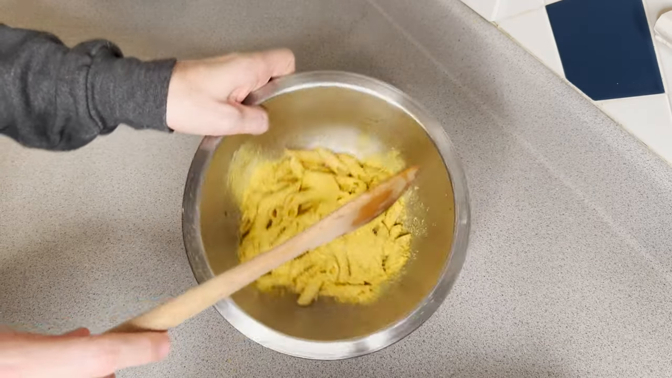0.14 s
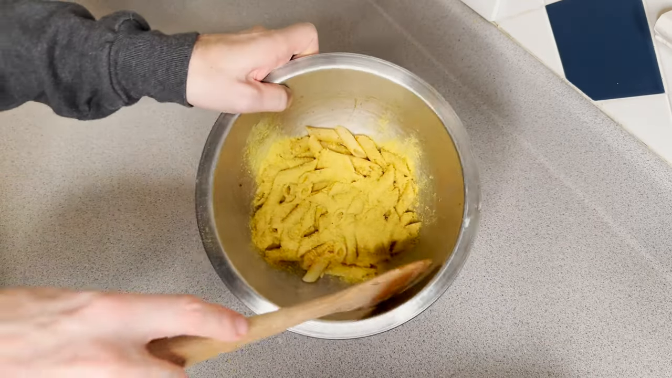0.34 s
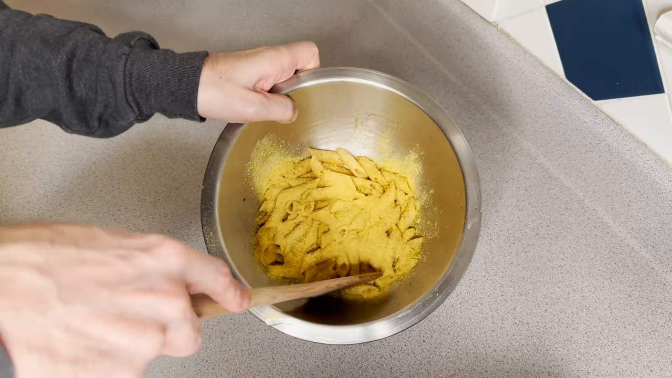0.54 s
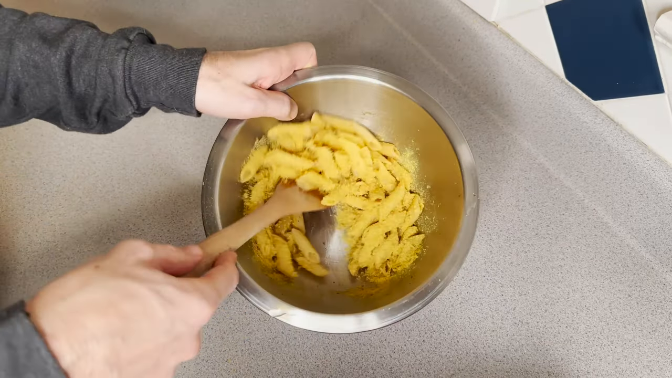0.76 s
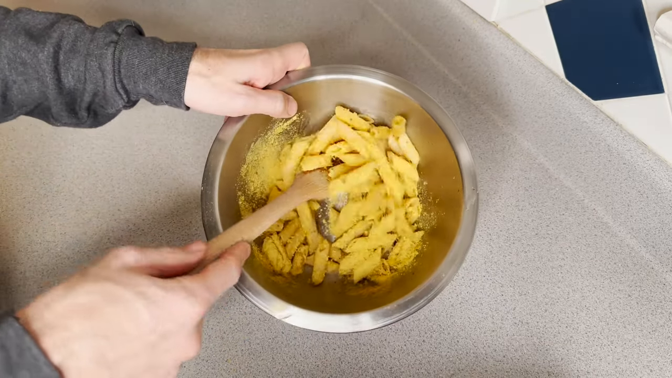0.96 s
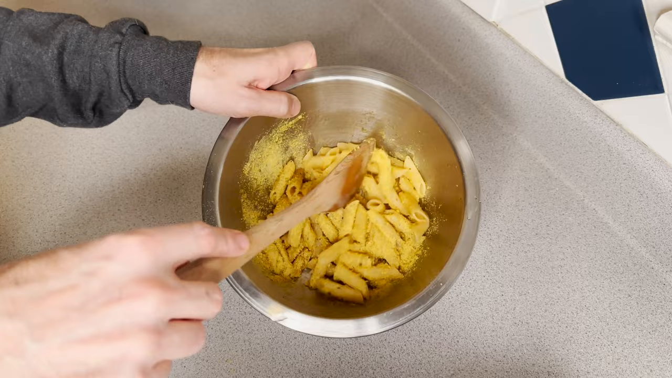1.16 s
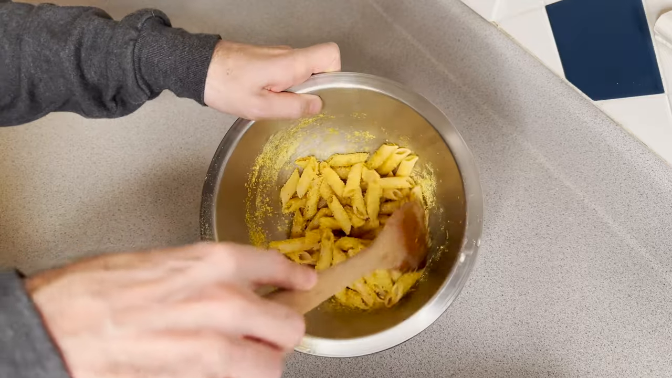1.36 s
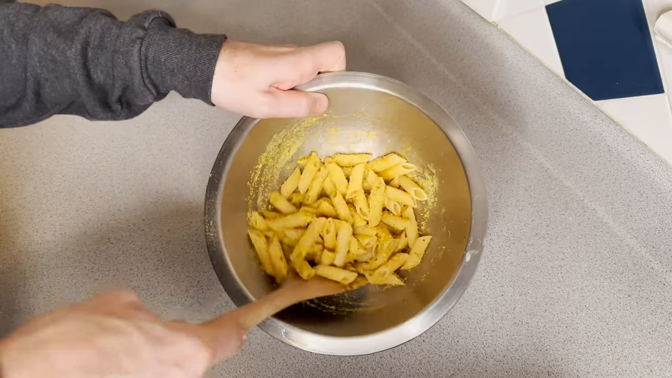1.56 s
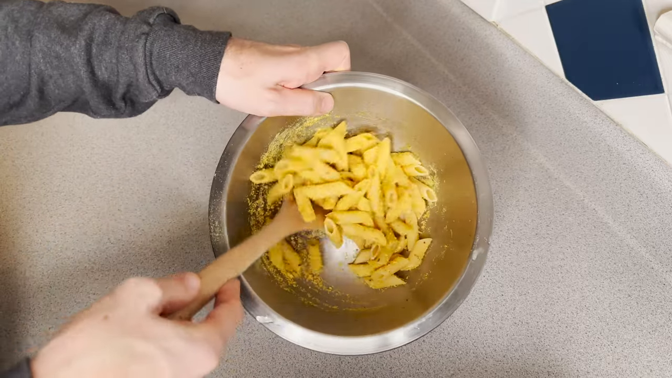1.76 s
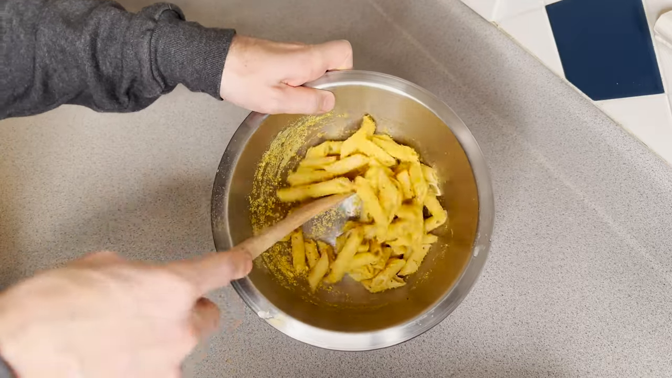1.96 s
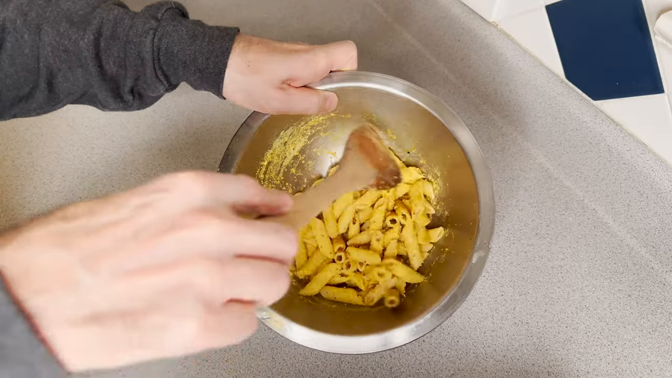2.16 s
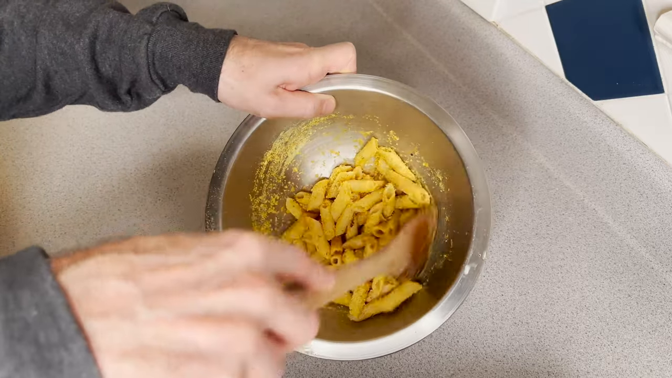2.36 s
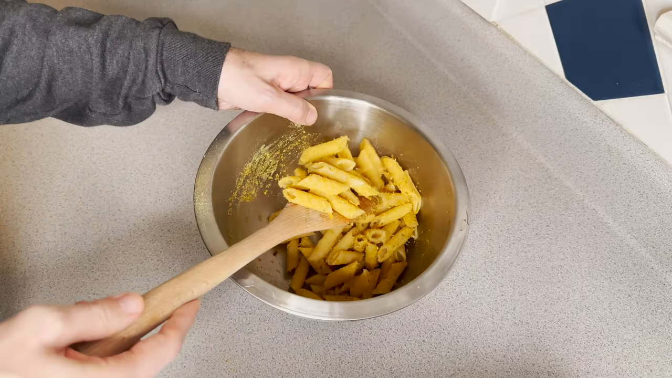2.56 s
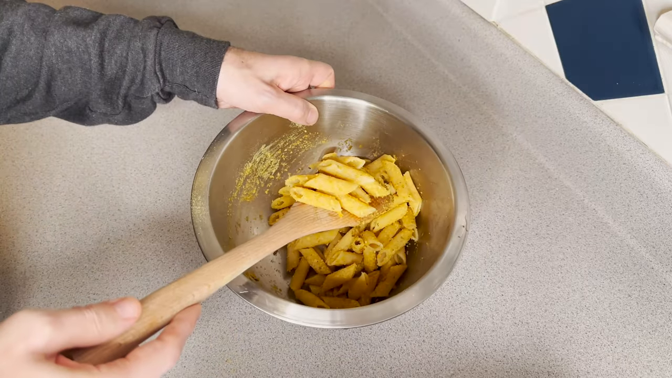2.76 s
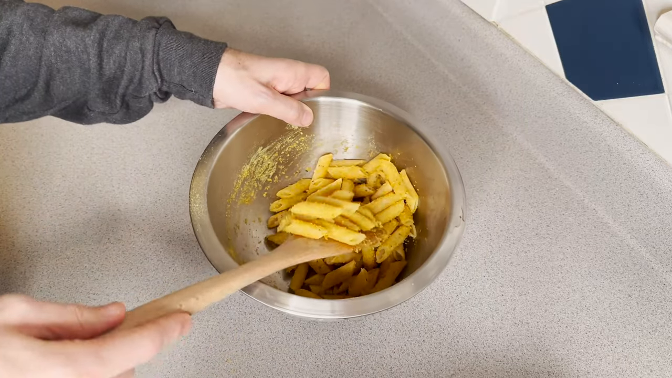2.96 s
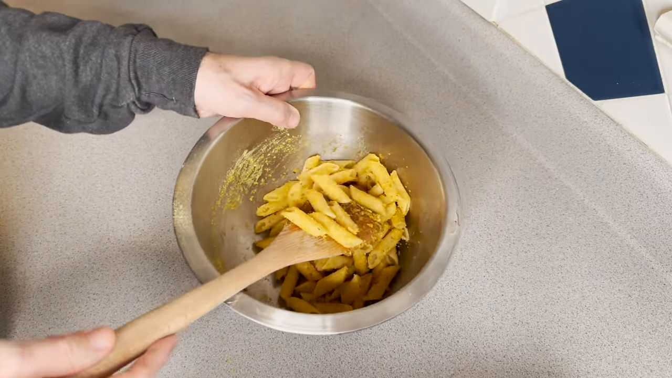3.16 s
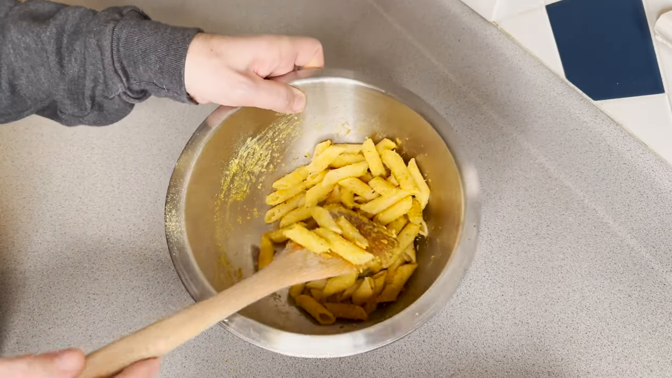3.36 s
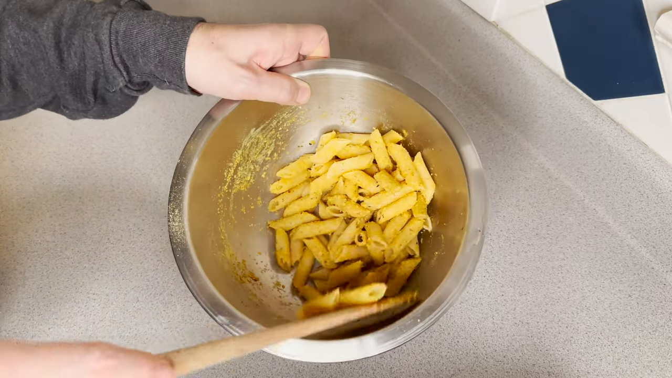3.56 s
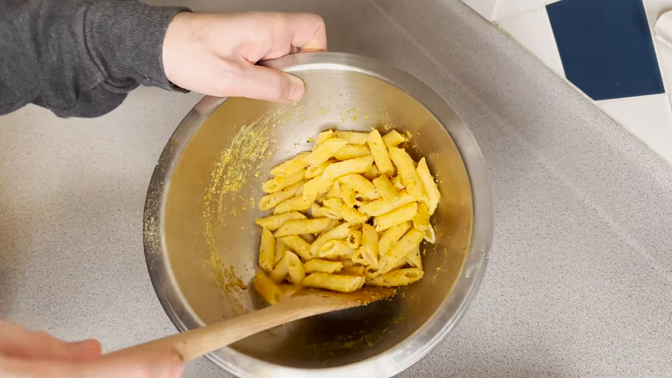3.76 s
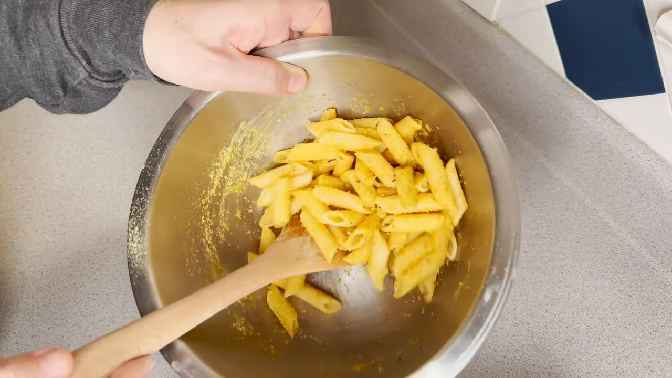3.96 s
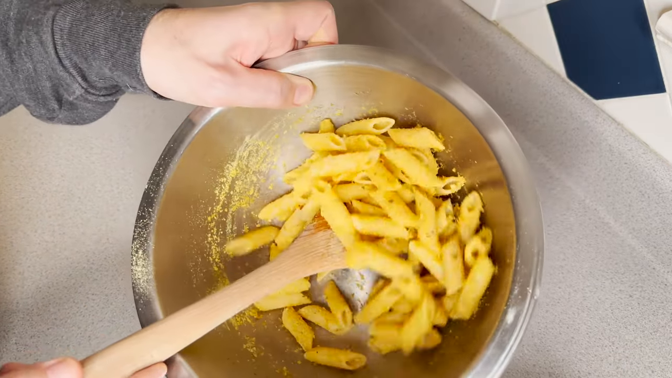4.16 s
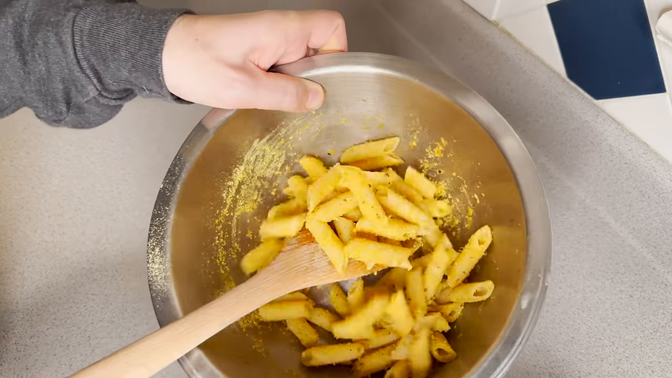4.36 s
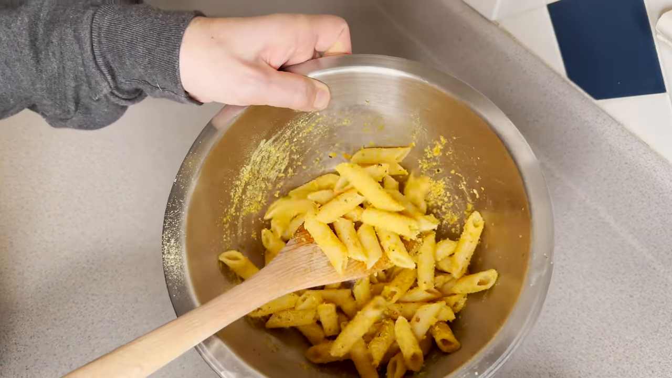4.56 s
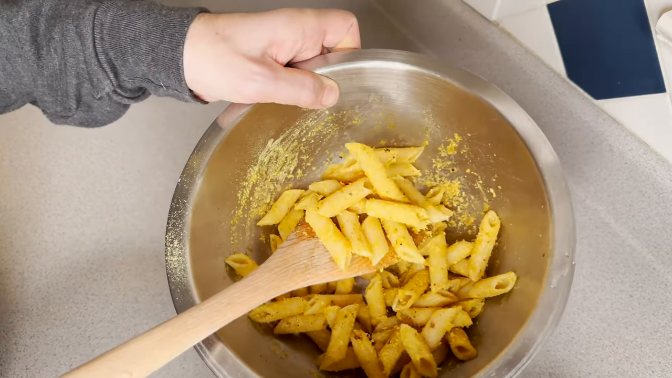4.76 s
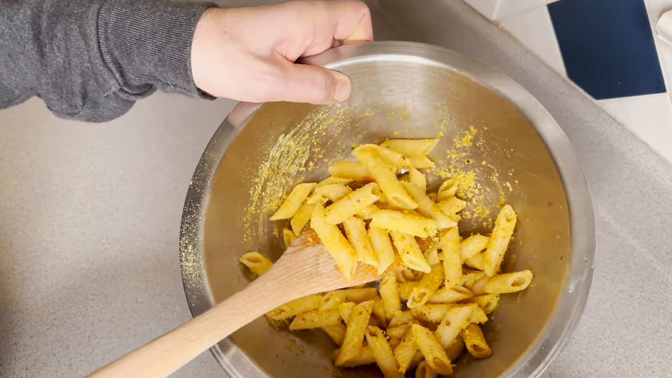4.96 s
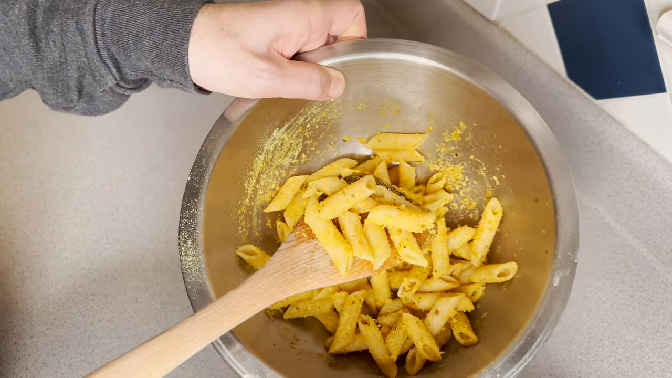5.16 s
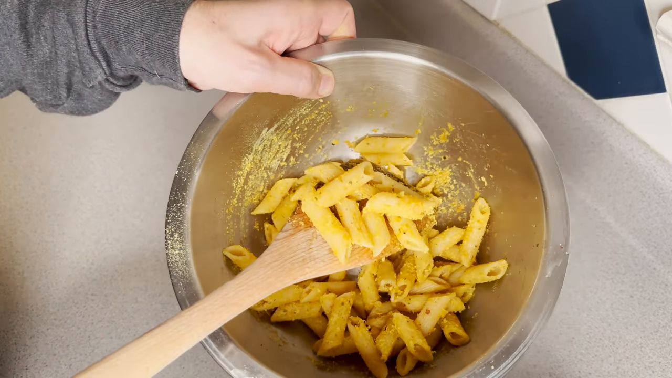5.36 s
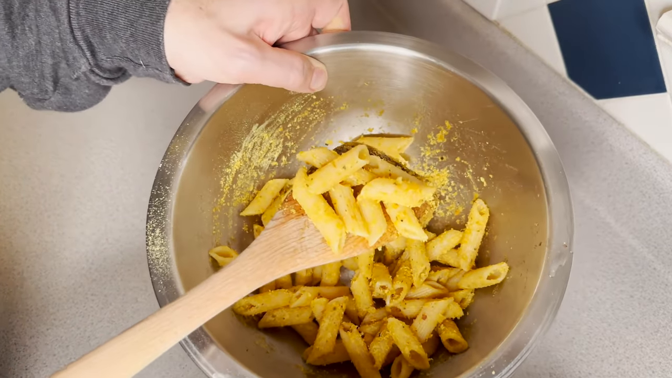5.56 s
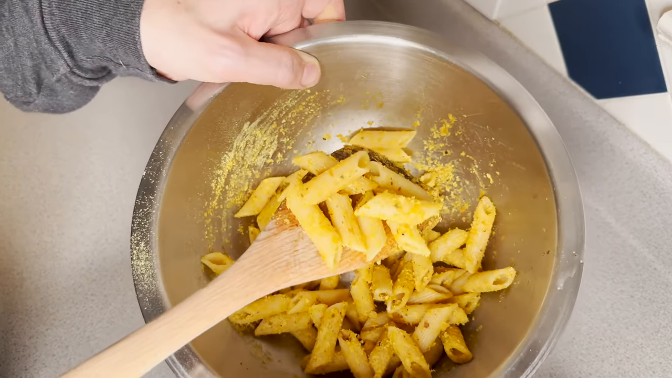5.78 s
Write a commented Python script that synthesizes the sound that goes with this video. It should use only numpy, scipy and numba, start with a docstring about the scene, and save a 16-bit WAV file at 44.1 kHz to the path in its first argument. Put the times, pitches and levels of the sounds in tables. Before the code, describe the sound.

A small, hard-surfaced kitchen, heard close from above in mono, with very faint appliance hum, airy noise and low rumble. A soft low bump opens; at 0.35 s the wooden spoon knocks the steel bowl with a short, hand-damped clonk, and at 0.5 s the bowl thuds deeply on the counter as pasta drags with a gritty hiss. A faint tap comes near 0.75 s. At 1.3 s a drier bump starts fuller scraping and swishing that fades by about 2.2 s; a lighter bump and brief scrape follow at 2.3 s. After a lull, two strong metallic knocks with small thuds land at 2.96 and 3.13 s. A sharper, crackier knock at 3.6 s and a duller one at 3.84 s carry coarse scraping between and after them. A weak tap at 4.15 s leads to tiny sticky ticks from 4.3 to 4.6 s, then only the quiet room remains.

```python
"""Kitchen counter in a small hard room: one hand holds a steel mixing bowl while a wooden spoon stirs pasta.
The phone records from above. Wood and pasta drag over the steel: gritty noise drives hiss bands and wall modes.
The bowl thuds on the counter and the spoon knocks the damped wall: both are sums of decaying modes.
Sticky pieces tick apart as filtered noise snaps; a noise tail makes the room's answer to these blows.
Under it lie a faint appliance hum of wavering tones, shaped noise and a swelling low rumble."""
import sys
import numpy as np
from scipy import signal
from scipy.fft import rfft, irfft, next_fast_len
from scipy.io import wavfile
from scipy.ndimage import uniform_filter1d
from numba import njit

SR = 44100
rng = np.random.default_rng(int(sys.argv[2]) if len(sys.argv) > 2 else 0)


def pcm_store(signal):
    """Save signal as 16-bit PCM."""
    levels = np.round(np.clip(np.atleast_2d(signal), -1, 1) * 32767)
    wavfile.write(sys.argv[1], SR, levels.astype(np.int16).T)


N = 256661
HOLD = 64  # samples for which slow controls stay put
DECADES = np.log(1000)  # a fall of 60 dB, for t60 decays

# bowl wall modes, damped by hand and food: f/Hz
BOWL_HZ = [490, 591, 692, 765, 823, 875, 926, 956, 1055, 1118, 1265, 1310, 1400, 1466, 1750, 1960, 2100,
           2200, 2317, 2445, 2570, 2710, 2800, 3020, 3280, 3550, 3850, 4250, 5400, 6200]
# relative strength of the same modes under a blow: level/dB
BOWL_LEVEL_DB = [-3, 3.5, -0.5, -4, -7, -10, -7.5, -2.5, 3, -2.5, 4, -6.5, -16, -4.5, -11, -12, -8.5, -10.5,
                 -11, -10, -8.5, -10.5, -11.5, -12.5, -11.5, -7, -7.5, -25, -21.5, -24]
# the rim's lowest mode rings on; higher modes die sooner
LOWEST_T60_S = 0.17
HIGHER_T60_S = 0.074 * (1000 / np.array(BOWL_HZ[1:])) ** 0.39
# bowl wall: f/Hz, level/dB, t60/s before a blow's ring length factor
BOWL = np.column_stack([BOWL_HZ, BOWL_LEVEL_DB, [LOWEST_T60_S, *HIGHER_T60_S]])


def undb(db):
    """Amplitude factor of a level in dB."""
    return 10 ** (np.asarray(db) / 20)


def unit(x):
    """Scale a sound to an RMS of 1."""
    return x / np.sqrt(np.mean(x ** 2))


def colour(x, points):
    """Shape a sound's spectrum by (f/Hz, level/dB) points, joined by lines over log frequency."""
    size = next_fast_len(len(x))
    hz = np.maximum(np.arange(size // 2 + 1) * SR / size, 1)
    at, db = np.transpose(points)
    gain = undb(np.interp(np.log(hz), np.log(at), db))
    return irfft(rfft(x, size) * gain, size)[:len(x)]


def walk(rate):
    """Random levels held 1 / rate s and slewed twice, one value per HOLD; RMS 1."""
    k = max(int(SR / HOLD / rate), 2)
    count = N // HOLD + 1
    steps = np.repeat(rng.standard_normal(count // k + 1), k)
    slewed = uniform_filter1d(uniform_filter1d(steps, k), k)
    return unit(slewed[:count])


def swell(s, rise_s, hold_s, t60):
    """Envelope that starts at s, swells evenly, holds and fades exponentially."""
    t = np.arange(N) / SR - s
    fade = np.exp(-DECADES * np.maximum(t - rise_s - hold_s, 0) / t60)
    return np.clip(t / rise_s, 0, 1) * fade


@njit
def svf(x, hz, width, gain, hold):
    """State-variable band-pass whose centre and drive change after every hold."""
    y, band, low, g, k = np.empty(len(x)), 0., 0., 0., 0.
    for i in range(len(x)):
        j = i // hold
        if i == j * hold:
            g, k = np.tan(np.pi * hz[j] / SR), width / hz[j]
        v = (band + g * (gain[j] * x[i] - low)) / (1 + g * (g + k))
        band = 2 * v - band
        low = low + 2 * g * v
        y[i] = k * v
    return y


def add(out, s, sound):
    """Lay a sound into the track from s seconds on."""
    i = int(s * SR)
    out[i:i + len(sound)] += sound[:N - i]


def kitchen():
    """Steady air and appliance noise, a swelling rumble and wavering mains lines."""
    # spectrum of air and appliance: f/Hz, relative level/dB per Hz
    air_points = [(47, -32), (80, -4.5), (156, -7.5), (186, -8.5), (323, -12.5), (550, -17), (643, -18),
                  (734, -16), (1560, -25.5), (1860, -25), (2030, -28.5), (4720, -32), (14300, -44),
                  (16000, -44.5)]
    # swells of the low rumble: t/s of the top, level/dB
    rumble_swells = [(.08, -53), (.53, -44), (1.87, -68), (4.15, -67.5), (4.70, -70.5)]
    # mains lines: f/Hz, level/dB about which each wavers
    mains_lines = [(60, -76), (180, -78), (719, -85)]
    air_db, rumble_db, rumble_walk_db = -72.5, -70.5, -0.5
    rise_s, fade_t60_s = 0.085, 0.39
    t = np.arange(N) / SR
    out = undb(air_db) * unit(colour(rng.standard_normal(N), air_points))

    rumble_points = [(12, -30.5), (24, -4.5), (31, -11.5), (42, -6.5), (62, -3.5), (95, -33), (200, -69.0)]
    rumble = unit(colour(rng.standard_normal(N), rumble_points))
    level = np.repeat(undb(rumble_db + rumble_walk_db * walk(2)), HOLD)[:N]
    for s, db in rumble_swells:
        level = level + undb(db) * swell(s - rise_s, rise_s, 0, fade_t60_s)
    out += rumble * level

    control_t = np.arange(N // HOLD + 1) * HOLD / SR
    for hz, db in mains_lines:
        waver_db = np.interp(t, control_t, 1.2 * walk(2))
        drift = np.interp(t, control_t, 0.15 * walk(1.9))  # phase, radians
        out += undb(db + waver_db) * np.sin(2 * np.pi * hz * t + drift)
    return out


def hiss(slips):
    """Surface noise in narrow bands that drift and flare on their own; neighbours have opposite signs."""
    # spectrum that shapes the summed bands: f/Hz, relative level/dB
    hiss_points = [(2650, -23), (4200, -11.5), (4900, -3), (6520, -2.5), (9610, -7), (13700, -16),
                   (16000, -26)]
    out = 0
    for k, hz in enumerate(4300 * 2 ** np.arange(0, 1.95, .1)):
        centre = np.minimum(hz * (1 + 0.012 * walk(9)), .45 * SR)
        flare = undb(1.6 * walk(40))
        band = unit(svf(slips, centre, 0.085 * hz, flare, HOLD))
        out = out + (-1) ** k * np.sqrt(hz) * band
    return unit(colour(out, hiss_points))


def rubbed(modes, slips, width, tilt_db, wander, flicker_db):
    """Gritty slips feed each mode, broadened by the pressing spoon; load shifts its pitch and share."""
    out = 0
    for k, (hz, db, _) in enumerate(modes):
        centre = hz * (1 + wander * walk(9))
        tone = svf(slips, centre, width * hz, undb(flicker_db * walk(45)), HOLD)
        share_db = .5 * db + tilt_db * np.log2(hz / 1000)  # tilt in dB per octave
        out = out + (-1) ** k * undb(share_db) * unit(tone)
    # roll off each group's ring above its top mode, keeping the scrape's treble soft
    return unit(colour(out, [(1.1 * hz, 0), (1.7 * hz, -30)]))


def strokes():
    """Spoon and pasta drag over steel: grainy slips drive a hiss and three groups of wall modes."""
    # drags over the wall, or pasta jumping after a blow: t/s, swell/s, hold/s, fade t60/s,
    # then surface hiss, upper wall ring, middle ring and lowest ring level/dB
    drag_rows = [(0.012, 0.017, 0.045, 1.08, -78.5, -71.5, -68, -69.5),
                 (0.354, 0.006, 0.0027, 0.17, -68, -50.5, -46.5, -45),
                 (0.37, 0.079, .01, 0.47, -66, -76, -67, -80),
                 (0.505, 0.27, 0.0069, 0.48, -68, -64.5, -69.5, -78),
                 (0.858, 0.038, 0.25, 1.3, -77, -76, -79, -86.5),
                 (1.306, 0.00096, 0.0018, 0.35, -58.5, -57.5, -56.5, -52),
                 (1.33, 0.13, 0.062, 0.75, -65, -60, -61, -68.5),
                 (1.508, 0.13, 0.14, 0.6, -61.5, -58.5, -61.5, -72),
                 (1.697, 0.045, 0.037, 0.23, -83, -53.5, -67, -85),
                 (1.864, 0.042, 0.18, 0.56, -77, -76.5, -76.5, -83),
                 (2.273, 0.0052, 0.0039, 0.3, -62, -62.5, -63, -61.5),
                 (2.327, 0.066, 0.099, 0.042, -67, -61, -64, -69.5),
                 (2.505, 0.03, 0.011, .3, -77.5, -81.5, -87.5, -84),
                 (3.603, 0.0053, 0.0027, 0.13, -69, -39, -34, -39.5),
                 (3.634, 0.025, 0.076, 0.67, -63.5, -58, -59, -78),
                 (3.774, 0.047, 0.045, 0.59, -65, -54, -56, -54.5),
                 (3.932, 0.05, 0.089, 0.35, -69, -63, -66, -59),
                 (4.158, .03, 0.081, .5, -84.5, -74.5, -72.5, -66),
                 (4.29, 0.034, 0.11, 0.51, -81, -77, -75.5, -73.5)]
    power = 0
    for row in drag_rows:
        power = power + (undb(row[4:])[:, None] * swell(*row[:4])) ** 2
    gains = np.sqrt(power)

    # dense grains a third of a millisecond long, none far above the rest, in uneven bursts
    grain_db = 2 * np.minimum(rng.exponential(size=N // 16 + 1), 4)
    grains = np.repeat(undb(grain_db), 16)[:N]
    bursts = np.repeat(undb(1.1 * walk(70)), HOLD)[:N]
    slips = rng.standard_normal(N) * grains * bursts

    high = rubbed(BOWL[15:29], slips, width=.035, tilt_db=1.5, wander=.015, flicker_db=3.3)
    middle = rubbed(BOWL[3:15], slips, width=0.054, tilt_db=7.5, wander=0.03, flicker_db=3.5)
    low = rubbed(BOWL[1:2], slips, width=0.13, tilt_db=0, wander=0.067, flicker_db=3.5)
    return (gains * [hiss(slips), high, middle, low]).sum(axis=0)


def ring(modes, weight, longer, rise_s):
    """Decaying modes that build up while the soft contact lasts."""
    hz, db, t60 = np.array(modes).T[:, :, None]
    t = np.arange(SR // 3) / SR
    waves = np.sin(2 * np.pi * hz * t) * np.exp(-DECADES * t / (t60 * longer))
    build_up = 1 - np.exp(-(t / rise_s) ** 2)
    return (weight[:, None] * undb(db) * waves).sum(axis=0) * build_up


def favour(modes, centre_hz, octaves):
    """A blow rings the modes near one pitch best."""
    distance = np.log2(np.array(modes)[:, 0] / centre_hz) / octaves
    return 1 / (1 + distance ** 2) ** 0.89


def thuds():
    """The bowl rocks down on the counter and rings the modes of the loaded top."""
    # counter top with the bowl resting on it: f/Hz, relative level/dB, t60/s before the ring length factor
    counter_modes = [(106.3, -4.5, 0.18), (131.4, -0.5, 0.21), (186, -9, 0.19), (293, -3, 0.14),
                     (414, -12, .08), (563.4, -21.5, 0.032)]
    # bowl foot on the counter: t/s, level/dB, best-rung f/Hz, spread/octaves, ring length factor
    foot_blows = [(0.03, -40, 136, 1, 0.7), (0.5138, -30, 128, 1.11, 1.46), (1.308, -30, 315, 0.82, 0.31),
                  (1.829, -57, 110, 0.68, 0.87), (2.278, -37, 267, 0.41, 0.45), (2.96, -40, 130, 1.1, 0.85),
                  (3.1344, -45.5, 277, 0.66, 0.47)]
    out = np.zeros(N)
    for s, db, hz, octaves, longer in foot_blows:
        weight = favour(counter_modes, hz, octaves)
        add(out, s, undb(db) * ring(counter_modes, weight, longer, rise_s=.0015))
    return out


def knocks():
    """Each place on the wall moves the modes by other shares and signs; wood adds a short crack."""
    # spoon on the wall: t/s, level/dB, contact/s, place along the wall (0-1), ring length factor,
    # crack/dB re the blow's level, then the modes it rings best: main group f/Hz, spread/octaves;
    # second and third group f/Hz, spread/octaves, level/dB re the main group
    spoon_blows = [(0.3455, -24, 0.0023, 0.11, 0.54, -22.5, 1260, 0.42, 504, 0.091, -3, 2540, 0.35, 4.5),
                   (0.5135, -38.5, 0.0022, 0.26, 0.36, -22, 676, 0.33, 1610, 0.1, 14, 3000, 0.35, -5),
                   (0.743, -50.5, 0.0012, 0.28, 0.85, -30, 1120, 0.046, 1690, 0.067, 2, 3000, 0.28, -18),
                   (1.308, -49.5, .0019, 0.6, 0.57, -17, 600, 0.23, 1310, 0.49, -26, 3430, 0.44, -16),
                   (2.960, -20.5, 0.0023, 0.24, 0.53, -28, 1176, 0.3, 2500, 0.12, -7.5, 3320, 0.14, -10.5),
                   (3.1351, -23.5, 0.0023, 0.26, 0.52, -35, 1100, 0.35, 2660, 0.11, -5, 3410, 0.051, -5.5),
                   (3.597, -25, 0.0017, 0.2, 0.5, -10.5, 694, 0.98, 1460, 0.089, -0.5, 2560, 0.33, 9.5),
                   (3.843, -25.5, 0.0018, 0.18, 0.26, -21.5, 635, 0.19, 1180, 0.17, 3.5, 2500, 0.28, -2),
                   (4.153, -48.5, 0.0031, 0.43, 1.17, -32, 1100, 0.11, 1750, 0.032, 7, 2620, 0.03, -2)]
    crack_points = [(1500, -35.5), (4000, 14.0), (6000, 11), (8000, -5), (15000, -21.5)]
    out, t = np.zeros(N), np.arange(SR // 20) / SR
    for s, db, contact_s, place, longer, crack_db, hz, octaves, *others in spoon_blows:
        weight = favour(BOWL, hz, octaves)
        for group_hz, group_octaves, group_db in np.reshape(others, (-1, 3)):
            weight = weight + undb(group_db) * favour(BOWL, group_hz, group_octaves)
        shape = np.cos(np.pi * place * np.arange(len(BOWL)))
        weight = weight * (0.96 * np.sign(shape) + 0.21 * shape)
        add(out, s, undb(db) * ring(BOWL, weight, longer, contact_s))

        crack = unit(colour(rng.standard_normal(len(t)), crack_points))
        envelope = np.exp(-t / 0.0046) * np.minimum(t / contact_s, 1)
        add(out, s, undb(db + crack_db) * crack * envelope)
    return out


def ticks():
    """Sticky pasta lets go in tiny snaps: decaying noise, band-passed twice around one pitch."""
    # pasta letting go: t/s, peak level/dB, f/Hz, t60/s of the noise ahead of the filter
    pasta_snaps = [(.85, -68.5, 3800, .015), (3.40, -74, 8860, 0.02), (4.28, -61.5, 6240, 0.046),
                   (4.306, -60.5, 8400, 0.028), (4.381, -68, 8160, 0.028), (4.492, -66, 2905, 0.04),
                   (4.492, -72, 6500, .03), (4.632, -62, 6240, 0.049), (4.632, -68, 3450, 0.03)]
    out, t = np.zeros(N), np.arange(SR // 20) / SR
    for s, db, hz, t60 in pasta_snaps:
        snap = rng.standard_normal(len(t)) * np.exp(-DECADES * t / t60)
        for _ in range(2):
            snap = svf(snap, np.array([1. * hz]), .4 * hz, np.ones(1), len(t))
        add(out, s, undb(db) * snap / np.abs(snap).max())
    return out


def room(x):
    """A diffuse tail of noise that dies at its own rate in each band."""
    # decay of the room by band: centre f/Hz, t60/s
    room_bands = [(150, 0.7), (600, 0.52), (1500, 0.39), (4000, 0.62), (9000, 0.27)]
    room_db = -12
    t, tail = np.arange(SR) / SR, 0
    for hz, t60 in room_bands:
        band_points = [(hz / 3, -30), (hz / 2.9, 0), (hz * 1.4, 0), (hz * 3, -30)]
        band = colour(rng.standard_normal(SR), band_points)
        tail = tail + band * np.exp(-DECADES * t / t60)
    tail = tail * np.clip((t - .006) / 0.018, 0, 1)  # the walls answer late
    tail = tail / np.sqrt(np.sum(tail ** 2))
    return undb(room_db) * signal.fftconvolve(x, tail)[:N]


def scene():
    """Blows with the room's answer, dry strokes and the kitchen bed, in one channel."""
    blows = knocks() + thuds() + ticks()
    return (blows + room(blows) + strokes() + kitchen())[None]


def record(dry):
    """The phone cuts the top: a steep low-pass at 15.8 kHz."""
    top_hz = 15800
    return signal.sosfilt(signal.ellip(10, .2, 80, top_hz, fs=SR, output="sos"), dry)


dry = scene()
out = record(dry)
pcm_store(out)
```